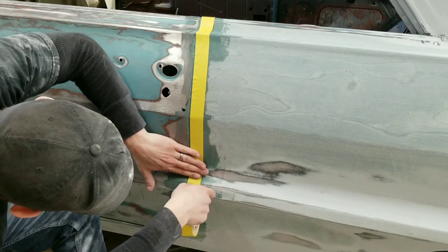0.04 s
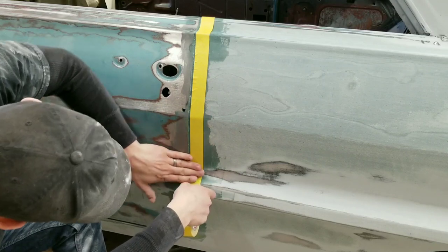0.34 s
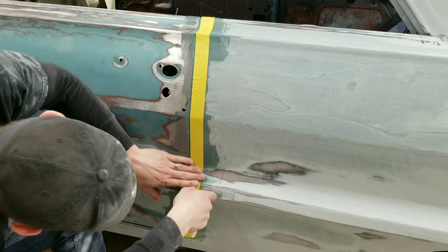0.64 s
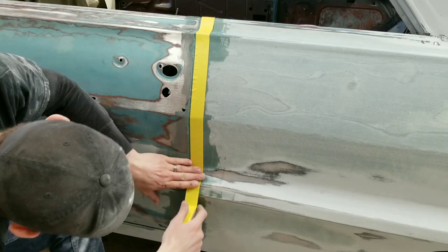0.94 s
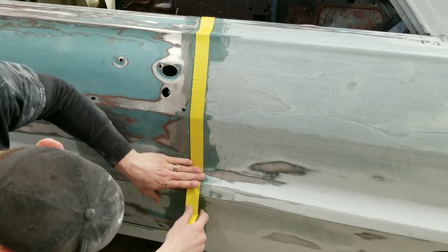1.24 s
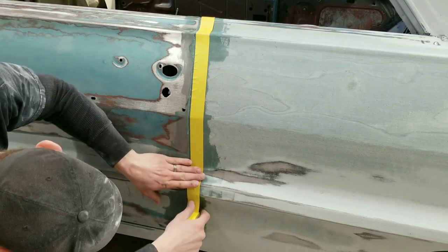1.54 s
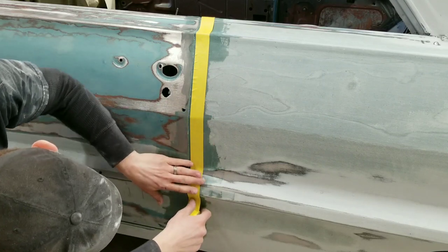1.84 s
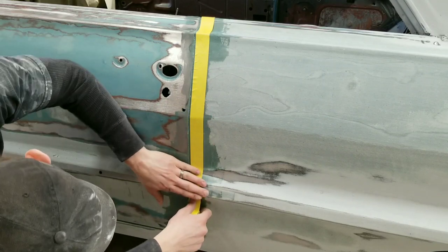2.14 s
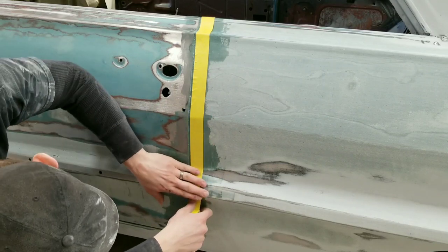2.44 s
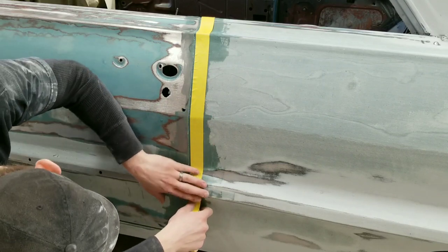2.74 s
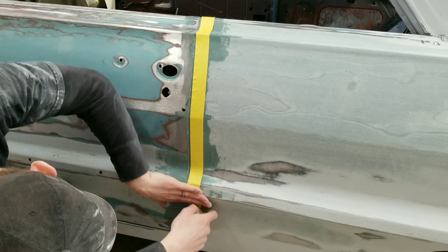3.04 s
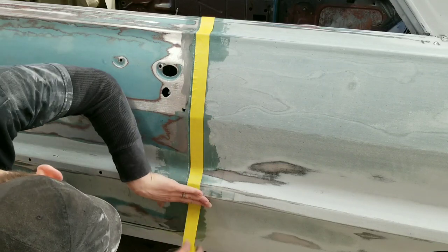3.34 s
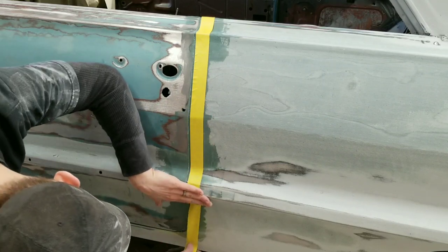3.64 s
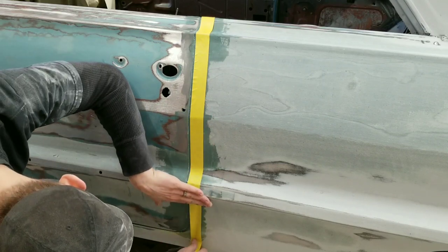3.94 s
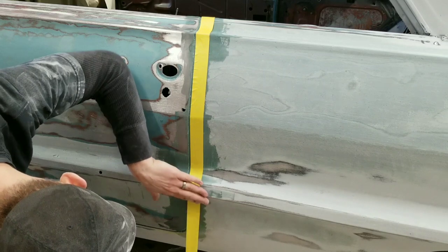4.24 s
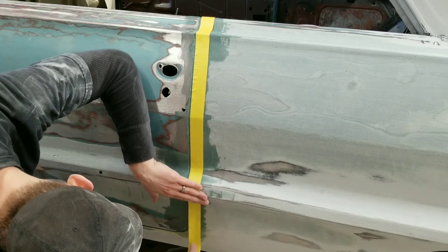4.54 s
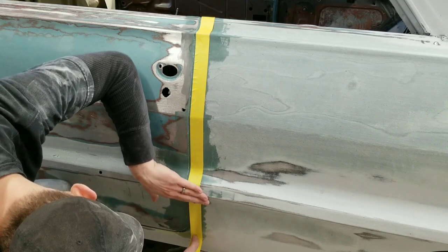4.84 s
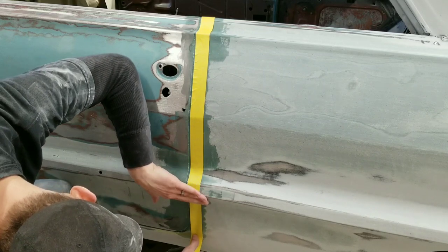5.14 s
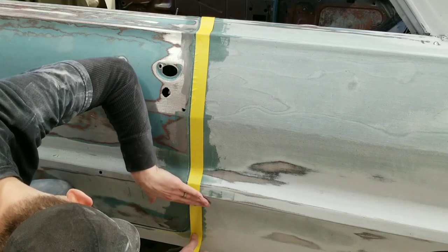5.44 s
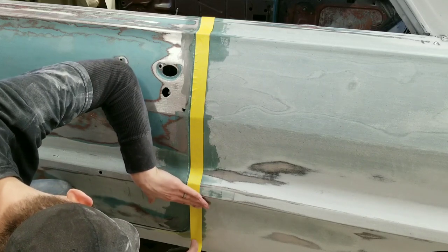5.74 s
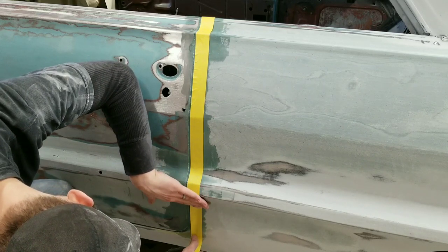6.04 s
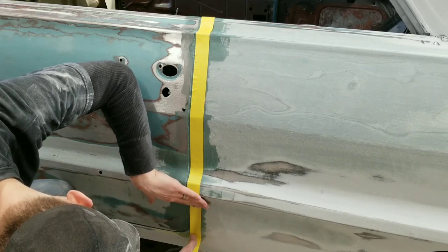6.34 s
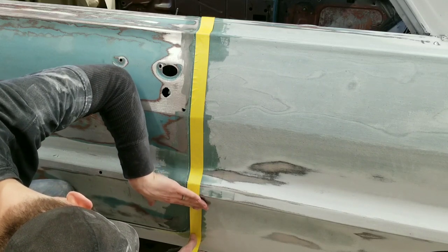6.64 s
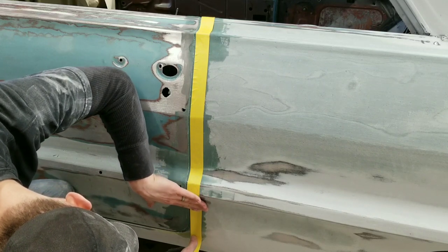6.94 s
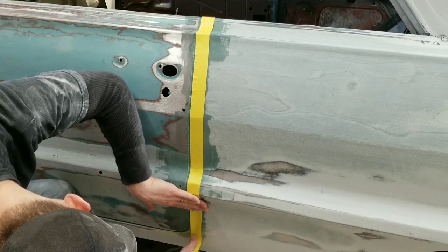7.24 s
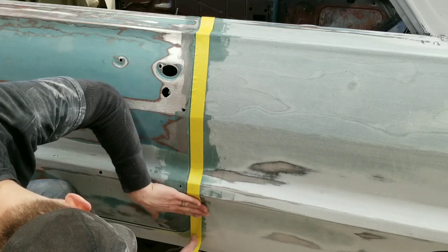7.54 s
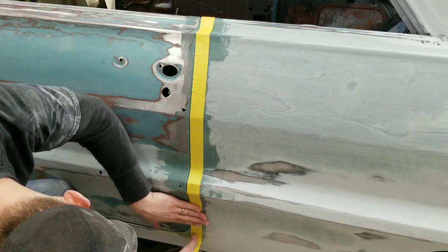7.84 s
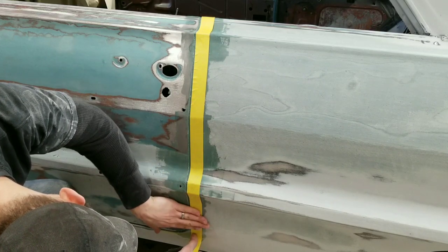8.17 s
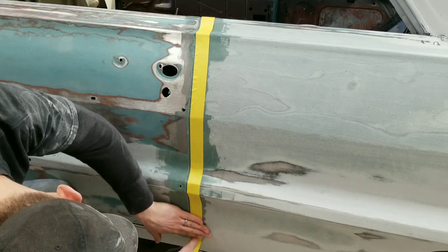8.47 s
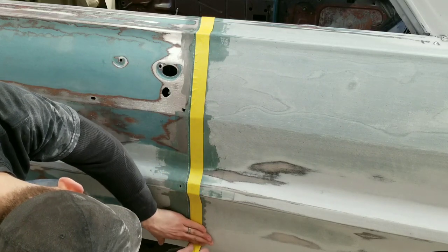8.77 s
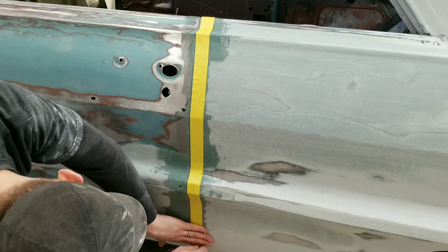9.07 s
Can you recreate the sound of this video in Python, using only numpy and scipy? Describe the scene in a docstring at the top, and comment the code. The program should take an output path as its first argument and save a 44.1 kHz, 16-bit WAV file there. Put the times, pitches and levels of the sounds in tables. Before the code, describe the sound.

Masking tape is handled close to the microphone in a quiet, slightly echoing garage with a low rumble and faint hiss. Fingers rub softly on the paper, and at about 0.8 seconds it crinkles into a short rip off the roll, with a sharp snap and a light knock. A dull thud comes from the car door near 1.4 seconds, then small crackles at 2.1 and 2.5. After a bump at 3 seconds comes the loudest sound, a rasping rip from 3.2 to 3.4 that rings the hollow cardboard core. Light crinkles and snaps follow from 4 to 4.7, and again around 5.5, 6.7 and 8.5 seconds, among faint rubbing and soft bumps on the panel until about 9 seconds. A small bird chirps faintly far away at the start and near 2.8, 5, 6.4 and 7.5 seconds.

```python
"""Close to the microphones, masking tape is rubbed onto a car door and twice ripped off its roll.
Threads of glue snap by the thousand and ring the paper strip and the cardboard core; the paper crinkles
as it is tugged, skin catches on its ridges, and the hand bumps the panel.
Throughout, the garage rumbles, the microphones hiss faintly and a small bird calls far off."""
import sys
import numpy as np
from scipy import signal
from scipy.fft import rfft, irfft, next_fast_len
from scipy.io import wavfile
from scipy.ndimage import uniform_filter1d

SR = 44100
rng = np.random.default_rng(int(sys.argv[2]) if len(sys.argv) > 2 else 0)


def persist_wave(psi):
    """Save psi, clipped to +-1, as 16-bit WAV."""
    counts = np.round(np.clip(psi, -1, 1) * 32767).astype(np.int16)
    wavfile.write(sys.argv[1], SR, np.atleast_2d(counts).T)


N = 401530
T = np.arange(N) / SR


def undb(db):
    """Decibels to gain."""
    return 10 ** (np.asarray(db) / 20)


def unit(x):
    """Scale to rms 1."""
    return x / np.sqrt(np.mean(x ** 2))


def at(points, hz):
    """Read (f/Hz, value) points on a log-frequency axis."""
    f, value = np.transpose(points)
    return np.interp(np.log(hz + 1), np.log(f), value)


def colour(x, spectrum, size=4096):
    """Minimum-phase filter of unit energy: the spectrum sets only its shape."""
    cepstrum = irfft(np.log(undb(at(spectrum, np.fft.rfftfreq(size, 1 / SR)))))
    cepstrum[1:size // 2] *= 2
    cepstrum[size // 2 + 1:] = 0
    impulse = irfft(np.exp(rfft(cepstrum)))
    return signal.oaconvolve(x, impulse / np.linalg.norm(impulse))[:N]


def noise():
    """White noise."""
    return rng.standard_normal(N)


def wander(per_s):
    """Smooth random drift of rms 1."""
    step = max(int(SR / per_s), 1)
    stairs = np.repeat(rng.standard_normal(N // step + 1), step)[:N]
    return unit(uniform_filter1d(stairs, step))


def crackle(per_s, spread_db):
    """Random clicks of uneven size, with a mean power of 1."""
    chance = np.clip(per_s / SR, 1e-4, 1)
    fires = rng.random(N) < chance
    draw = noise()
    sizes = unit(np.sign(draw) * undb(spread_db * np.minimum(abs(draw), 2)))
    return fires * sizes / np.sqrt(chance)


def swell(peak_s, rise_s, fall_s, hold_s=0):
    """Exponential rise, hold and exponential fall; rise and fall are time constants."""
    return np.exp(-np.clip(np.maximum((peak_s - T) / rise_s, (T - peak_s - hold_s) / fall_s), 0, 20))


def diffuse(gain, spectrum, side_db):
    """Noise that fills the room; the lower side_db, the more alike at the two microphones."""
    mid, side = (colour(gain * noise(), spectrum) for _ in range(2))
    return mid + undb(side_db) * side * np.array([[1], [-1]])


def echoes(size):
    """Frequencies and spectra of random echoes at both microphones; long waves reach the two alike."""
    hz = np.fft.rfftfreq(size, 1 / SR)
    apart = 1 - np.sinc(hz / 1800) ** 2
    mid, side = np.exp(2j * np.pi * rng.random((2, 1, len(hz))))
    return hz, mid * np.sqrt(1 - apart / 2) + side * np.sqrt(apart / 2) * np.array([[1], [-1]])


# Reverberation of the garage: f/Hz, time to fall 60 dB/s
GARAGE_DECAY = [(150, 1), (500, 1), (1500, .62), (3000, 0.54), (6000, 0.49), (10000, 0.38), (15000, 0.27)]


def garage(x, direct_db, near_db, tail_db, positions, near_fall_s=0.019, size=32768):
    """Direct sound, quick echoes off the door that shift as the source moves, and a darkening tail."""
    t = np.arange(size) / SR
    hz, late = echoes(size)
    band_hz, t60s = np.transpose(GARAGE_DECAY)
    bands = [at(list(zip(band_hz, pick)), hz) for pick in np.eye(len(band_hz))]
    tail = sum(irfft(late * band) * np.exp(-np.log(1000) * t / t60) for band, t60 in zip(bands, t60s))
    fade_in = 1 - np.exp(-(t / 0.005) ** 2)
    tail = unit(tail * fade_in) / np.sqrt(size)
    heard = undb(tail_db) * signal.oaconvolve(x[None], tail, axes=1)[:, :N]
    t = t[:size // 8]
    shares = np.array([wander(60) for _ in range(positions)]) ** 4  # one position tends to dominate
    shares /= np.linalg.norm(shares, axis=0) + 1e-18
    for k, share in enumerate(shares):
        cluster = irfft(echoes(len(t))[1]) * np.exp(-t / near_fall_s) * (t > 0.001)
        path = undb(near_db) * unit(cluster) / np.sqrt(len(t))
        path[[0, 1], [0, 1 + k % 2]] += undb(direct_db)  # the right microphone is a hair further away
        heard += signal.oaconvolve((x * share)[None], path, axes=1)[:, :N]
    return heard


# Self-noise of the left and the right microphone: f/Hz, relative level/dB
LEFT_MIC_SPECTRUM = [(200, 8.5), (900, -7.5), (1400, -3.5), (1750, 4), (2100, 7.5), (2500, -5),
                     (3200, -12.5), (6000, -18), (9000, -27.5), (12500, -8.5), (15500, -10)]
RIGHT_MIC_SPECTRUM = [(200, 4.5), (900, -2), (2100, -5.5), (3200, -8.5), (6000, -14), (9000, -19.5),
                      (12500, -4), (15500, -7.5)]
# Rumble of the building, all around: f/Hz, relative level/dB
RUMBLE_SPECTRUM = [(20, -17), (35, -9.5), (57, -1.5), (80, -3.5), (130, -14), (250, -23), (450, -21),
                   (800, -41.5), (3000, -71.5)]
# Its slow rise and fall: t/s, level/dB
RUMBLE_LEVELS = [(0, -58.5), (1.3, -53), (1.8, -58.5), (5.7, -59), (6.0, -55.5), (6.5, -59), (8.2, -59.5),
                 (9.1, -56.5)]


def room_tone(rumble_gain_db=1, waver_db=1.5, left_hiss_db=-65, right_hiss_db=-71):
    """The building's wavering rumble, a little to the right, and each microphone's own hiss."""
    level_db = np.interp(T, *np.transpose(RUMBLE_LEVELS)) + rumble_gain_db + waver_db * wander(5.3)
    rumble = diffuse(undb(level_db), RUMBLE_SPECTRUM, side_db=-16)
    left = undb(left_hiss_db) * colour(noise(), LEFT_MIC_SPECTRUM)
    right = undb(right_hiss_db) * colour(noise(), RIGHT_MIC_SPECTRUM)
    return rumble * undb([[-1.3], [1.2]]) + np.array([left, right])


# One call, before stretch and pitch factor:
# t into the call/s, length/s, first f/Hz, last f/Hz, relative level/dB, rasp as a share of the pitch
BIRD_NOTES = [(0, .055, 4550, 4438, -15.5, .045), (.05, .048, 3480, 4020, -2, .03),
              (.08, .042, 4046, 2941, -3.5, 0.081)]
# The bird, far off: t/s, level/dB, pitch factor, time stretch, stress on the first note/dB
BIRD_CALLS = [(.072, -62.5, 1, 1.1, -4), (2.807, -65.5, 1.05, 1.1, -3), (4.966, -64, 1.08, 1.7, 10),
              (6.393, -62, 1, 1, -0.5), (7.487, -59.5, 0.98, 0.98, -1)]


def bird():
    """One call, repeated: a faint high note, a rising whistle and a raspy fall."""
    song, wobble = np.zeros(N), wander(1400)
    for start, call_db, pitch, stretch, stress_db in BIRD_CALLS:
        for k, (offset, length, first_hz, last_hz, note_db, rasp) in enumerate(BIRD_NOTES):
            progress = np.linspace(0, 1, int(length * stretch * SR))
            span = int((start + offset * stretch) * SR) + np.arange(len(progress))
            hz = pitch * (first_hz + (last_hz - first_hz) * progress) * (1 + rasp * wobble[span])
            whistle = np.sqrt(2) * np.sin(2 * np.pi * np.cumsum(hz) / SR)
            gain = undb(call_db + note_db + stress_db * (k == 0))
            song[span] += gain * np.sin(np.pi * progress) * whistle
    return song


# The hand along the tape on the door: t/s, length/s, skin rub level/dB, door murmur level/dB
HAND_STROKES = [(0.167, 0.08, -68, -63.5), (0.61, 0.41, -64.5, -57.5), (1.045, .08, -56, -51.5),
                (1.276, 0.095, -67.5, -55), (1.975, 0.17, -72.5, -62.5), (2.396, 0.063, -73, -74),
                (2.774, 0.07, -72.5, -83), (3.055, 0.087, -64.5, -49), (4.08, 0.15, -67.5, -60),
                (5.055, 0.031, -73, -72.5), (5.325, 0.32, -81.5, -54.5), (6.602, 0.22, -73, -66),
                (7.256, 0.75, -72, -55.5), (8.24, 0.11, -77.5, -59), (8.438, 0.056, -64.5, -50.5),
                (8.619, 0.12, -64, -55), (8.99, 0.074, -73.5, -55.5)]


def hand_strokes(attack_s=0.048, release_s=0.078, rest_rub_db=-84.5, rest_lean_db=-60):
    """How hard the hand rubs the tape and leans on the door; it never lies quite still."""
    rubbing, leaning = undb(rest_rub_db), undb(rest_lean_db)
    for start, length, rub_db, lean_db in HAND_STROKES:
        effort = swell(start, attack_s, release_s, length)
        rubbing = np.hypot(rubbing, undb(rub_db) * effort)
        leaning = np.hypot(leaning, undb(lean_db) * effort)
    return rubbing, leaning


# The door panel's low murmur and its harder knock: f/Hz, relative level/dB
PANEL_SPECTRUM = [(30, -12.5), (70, -9), (110, 3), (170, -2.5), (260, -4.5), (420, -9.5), (560, -14),
                  (750, -24.5), (1200, -40.5), (3000, -44.5), (8000, -68)]
KNOCK_SPECTRUM = [(150, -19.5), (400, -5.5), (560, 4), (800, -1), (1200, -7.5), (2000, -8.5), (5000, -30.5)]
# Soft bumps on the door: t/s, level/dB, fall/s, relative knock level/dB
DOOR_BUMPS = [(.89, -56.5, 0.13, 18), (1.383, -47, 0.16, -27.5), (3.03, -50, 0.084, 2),
              (4.649, -58, 0.067, 5.5), (5.478, -53, 0.18, -2.5), (6.67, -54.5, 0.096, -13),
              (7.33, -51.5, 0.11, -34.5), (7.754, -53.5, 0.047, -17), (8.498, -53.5, .083, 6.5),
              (8.8, -52, 0.089, -18)]


def car_door(leaning, lean_gain_db=-3, knock_gain_db=-4, rise_s=0.0069):
    """The panel murmurs under the shifting hand and thuds when it is bumped."""
    push, knock = leaning * undb(lean_gain_db), 0
    for peak_s, db, fall_s, knock_db in DOOR_BUMPS:
        blow = undb(db) * swell(peak_s, rise_s, fall_s)
        push = np.hypot(push, blow)
        knock += blow * undb(knock_db + knock_gain_db)
    return diffuse(push, PANEL_SPECTRUM, side_db=-9.5) + diffuse(knock, KNOCK_SPECTRUM, side_db=-1)


# Skin on the tape, close up: f/Hz, relative level/dB
SKIN_SPECTRUM = [(300, -0.5), (900, -3.5), (2800, -10), (5500, 0.5), (7200, -1), (9300, -8), (12500, 1.5),
                 (15500, -7.5)]


def skin_rub(rubbing, ridges_per_s=6000, uneven_db=1):
    """Skin catches on the fine ridges of the crepe paper."""
    catches = colour(crackle(ridges_per_s, spread_db=7), SKIN_SPECTRUM)
    return catches * rubbing * undb(uneven_db * wander(40))


# Short tugs on the strip, close up: peak t/s, level/dB, rise/s, fall/s, relative body level/dB
STRIP_TUGS = [(0.386, -64, 0.012, 0.061, 0), (0.777, -49, .016, 0.015, -13),
              (.815, -41, 0.019, 0.035, -9.5), (0.873, -29, 0.0047, 0.016, 4),
              (2.104, -48.5, .004, 0.0064, -10), (2.335, -55, 0.02, 0.071, -11.5),
              (2.532, -46, 0.01, 0.018, -1), (3.052, -56.5, .03, 0.022, -1), (3.23, -27.5, 0.014, 0.036, 2),
              (3.396, -31, 0.02, 0.017, 9.5), (3.779, -53.5, .008, 0.016, -20),
              (3.986, -48.5, .012, 0.036, -13), (4.165, -46.5, .021, 0.017, -10),
              (4.344, -37, 0.011, 0.014, -6), (4.43, -54.5, 0.023, .01, 2.5),
              (4.6406, -41.5, .001, 0.04, 0.5), (5.607, -32.5, 0.0023, 0.00093, -15.5),
              (5.614, -49, 0.05, 0.011, -8), (6.704, -51.5, 0.019, .03, -6),
              (8.502, -53.5, .003, 0.0088, -2)]
# Single loud snaps of glue or paper: t/s, level/dB, relative body level/dB
SINGLE_SNAPS = [(.774, -21, -18), (.816, -22, -18), (0.884, -3, -10), (2.1031, -29, -10), (2.5317, -16, -7),
                (2.537, -33, 0), (3.032, -42, 12), (3.981, -27.5, -15), (4, -26, -6), (4.151, -23, -18),
                (4.292, -30, -20), (4.344, -21, -4), (4.353, -22.5, 2), (4.64, -28, -8.5),
                (5.4766, -21.5, -5.5), (5.4789, -23, -2), (5.505, -27, -10), (5.61, -23, -11),
                (6.701, -26.5, -6), (6.716, -26, -10.5), (8.501, -29.5, -4)]
# The paper's bright crinkle and its lower body: f/Hz, relative level/dB
CRINKLE_SPECTRUM = [(1200, -39.5), (2800, -16.5), (4200, 0), (5500, 3), (7000, 2), (9300, -5), (12500, 2),
                    (15500, -4.5)]
BODY_SPECTRUM = [(200, -27), (600, -6.5), (1200, -6), (2500, 2.5), (3500, 2.5), (6000, -20), (12000, -32)]


def paper_crinkle(creases_per_s=6000, body_gain_db=-5, snap_gain_db=1):
    """Each tug frees a little burst of clicks; single snaps stand out."""
    bright, body = np.zeros(N), np.zeros(N)
    clicks = crackle(creases_per_s, spread_db=6.5)
    for peak_s, db, rise_s, fall_s, body_db in STRIP_TUGS:
        burst = clicks * undb(db) * swell(peak_s, rise_s, fall_s)
        bright += burst
        body += burst * undb(body_db)
    for snap_s, db, body_db in SINGLE_SNAPS:
        bright[int(snap_s * SR)] += undb(db + snap_gain_db)
        body[int(snap_s * SR)] += undb(db + snap_gain_db + body_db)
    return colour(bright, CRINKLE_SPECTRUM) + undb(body_gain_db) * colour(body, BODY_SPECTRUM)


# Modes of the roll's cardboard core: f/Hz, band-pass width/Hz, relative level/dB
CORE_MODES = [(273, 55, 3.5), (375.9, 70, 3.5), (560.2, 100, -3.5), (1472, 290, -5), (1850, 77, -6.5),
              (2020, 130, -6.5)]


def cardboard_core(threads, turning, jolt, jolt_tilt=0.32):
    """Snapping threads ring the core as it turns; a jolt is slow and favours the low modes."""
    lowest_hz = CORE_MODES[0][0]
    steady, ringing = 0, 0
    for hz, width_hz, db in CORE_MODES:
        b, a = signal.iirpeak(hz, hz / width_hz, fs=SR)
        mode = undb(db) * signal.lfilter(b, a, signal.lfilter(b, a, threads))  # twice, for steep skirts
        steady += mode
        ringing += mode * (turning + jolt * (lowest_hz / hz) ** jolt_tilt)
    return ringing / np.std(steady)


def free_strip(threads, hz, width_hz=200):
    """The freed length of paper rings in one resonance whose centre glides along hz."""
    carrier = np.exp(2j * np.pi * np.cumsum(hz) / SR)
    lowpass = signal.butter(2, width_hz / 2, fs=SR)
    return unit((signal.lfilter(*lowpass, threads / carrier) * carrier).real)


# Two rips off the roll, close up: start t/s, stop t/s, level/dB, opening jerk level/dB,
# core jolt level/dB, strip ring relative to the pull/dB, strip's first f/Hz, strip's last f/Hz
TAPE_RIPS = [(0.829, 1.001, -36, -28.5, -49, 0, 580, 598),
             (3.174, 3.402, -17.5, -36, -31.5, -8, 1398, 1090)]
# Glue peeling apart: f/Hz, relative level/dB
PEEL_SPECTRUM = [(100, -49.5), (220, -32.5), (500, -11.5), (800, -12), (1400, -5), (2100, -2.5), (3000, -3),
                 (4800, 0.5), (6500, 0), (9000, -4.5), (10500, -3), (12500, -0.5), (15500, -3.5)]
PULL_ATTACK_S, PULL_POWER, PULL_RELEASE_S = 0.07, 2.4, 0.018  # the arm builds up speed, then lets go
JERK_LAG_S, JERK_S = 0.043, 0.015  # the glue gives way all at once soon after the start
JOLT_FALL_S, HALT_LAG_S, HALT_DB = 0.035, 0.024, -2.5  # the core is jolted as the roll starts and stops
STRIP_FADE_S, STRIP_SETTLE_S = 0.032, 0.055  # the strip rings as it is jerked taut; its pitch settles


def tape_rips(threads_per_s=14000, turning_db=-21, core_gain_db=-6, strip_gain_db=-6.5):
    """Glue threads part, more densely the harder the pull, and ring the core and the free strip."""
    pull, jolt, turning, taut, strip_hz = np.zeros((5, N))
    for start, stop, db, jerk_db, jolt_db, strip_db, first_hz, last_hz in TAPE_RIPS:
        speed_up = np.clip((T - start) / PULL_ATTACK_S, 0, 1) ** PULL_POWER
        running = speed_up * swell(start, PULL_ATTACK_S, PULL_RELEASE_S, stop - start)
        since_jerk = T - start - JERK_LAG_S
        force = undb(db) * running + undb(jerk_db) * np.exp(-(since_jerk / JERK_S) ** 2)
        pull += force
        spin_up = swell(start + PULL_ATTACK_S, JERK_S, JOLT_FALL_S)
        halt = swell(stop + HALT_LAG_S, JERK_S, PULL_RELEASE_S)
        jolt += undb(jolt_db) * (spin_up + undb(HALT_DB) * halt)
        turning += undb(db + turning_db) * running
        age = np.maximum(since_jerk, 0)
        taut += undb(strip_db) * force * np.exp(-age / STRIP_FADE_S)
        glide_hz = last_hz + (first_hz - last_hz) * np.exp(-age / STRIP_SETTLE_S)
        strip_hz = np.where(T > start - PULL_ATTACK_S, glide_hz, strip_hz)
    grip = undb(1.34 * wander(300) + 0.37 * wander(70))  # the glue holds and lets go unevenly
    threads = crackle(threads_per_s * np.sqrt(pull / pull.max()) + 400, spread_db=6.5) * grip
    peel = pull * colour(threads, PEEL_SPECTRUM)
    core = undb(core_gain_db) * cardboard_core(threads, turning, jolt)
    strip = undb(strip_gain_db) * taut * free_strip(threads, strip_hz)
    return peel + core + strip


def scene():
    """Tape and hand close to the microphones; the distant bird arrives mostly by way of the walls."""
    rubbing, leaning = hand_strokes()
    roll = garage(tape_rips(), direct_db=-5.5, near_db=0.5, tail_db=-8.5, positions=6)
    handling = paper_crinkle() + skin_rub(rubbing)
    hand = garage(handling, direct_db=-0.5, near_db=-1.5, tail_db=-5, positions=4)
    far_bird = garage(bird(), direct_db=-16, near_db=4, tail_db=1.5, positions=4)
    return roll + hand + far_bird + car_door(leaning) + room_tone()


def gain_control(x, threshold_db=-21, ratio=2.5, recover_db_per_s=0.62, window_s=0.057):
    """The recorder turns itself down on loud sound and creeps back up."""
    power = uniform_filter1d(np.mean(x ** 2, axis=0), int(window_s * SR))
    level_db = 10 * np.log10(np.maximum(power, 1e-12))
    cut_db = np.maximum(level_db - threshold_db, 0) * (1 - 1 / ratio)
    recovery_db = recover_db_per_s * T
    duck_db = np.maximum.accumulate(cut_db + recovery_db) - recovery_db
    return x * undb(-duck_db)


def record(dry, left_air_db=3, right_air_db=1, top_hz=16000):
    """The gain ducks on the long rip; the left microphone is the brighter one; the very top is cut."""
    size = next_fast_len(N, real=True)
    hz = np.fft.rfftfreq(size, 1 / SR)
    air = undb([at([(8500, 0.0077), (13000, db)], hz) for db in (left_air_db, right_air_db)])
    brightened = irfft(rfft(gain_control(dry), size) * air, size)[:, :N]
    return signal.sosfilt(signal.ellip(10, 0.2, 70, top_hz, fs=SR, output="sos"), brightened)


dry = scene()
out = record(dry)
persist_wave(out)
```